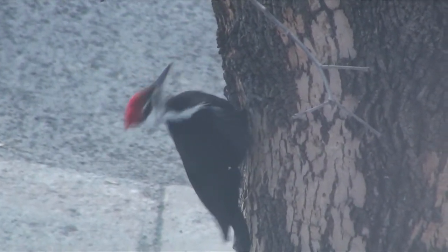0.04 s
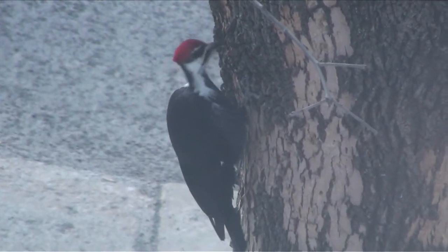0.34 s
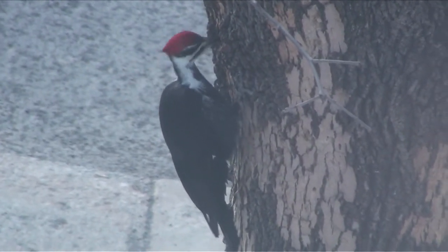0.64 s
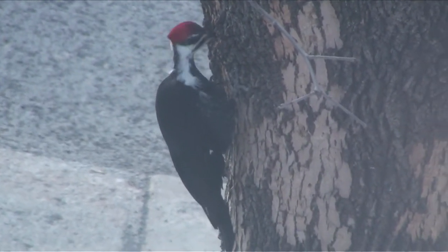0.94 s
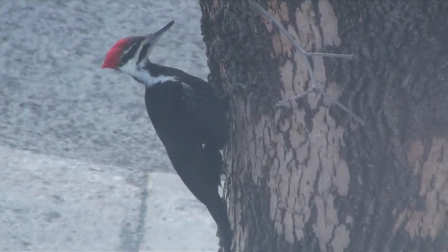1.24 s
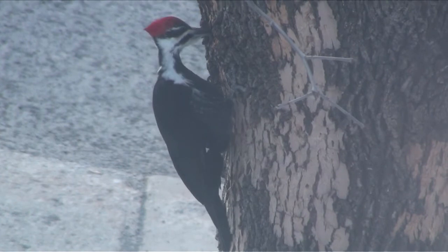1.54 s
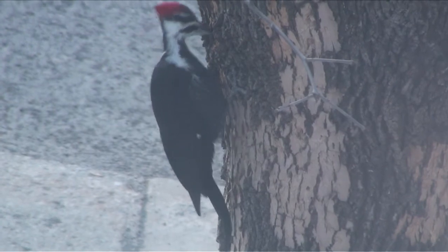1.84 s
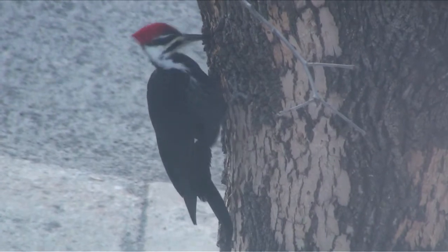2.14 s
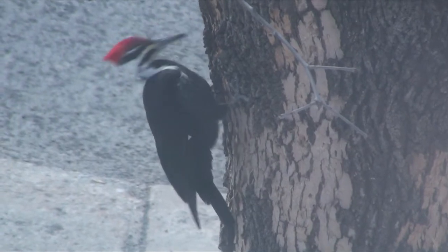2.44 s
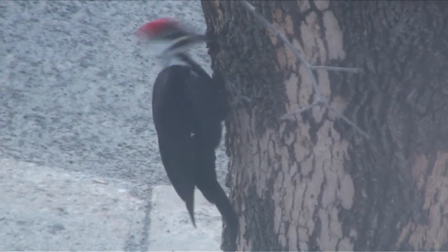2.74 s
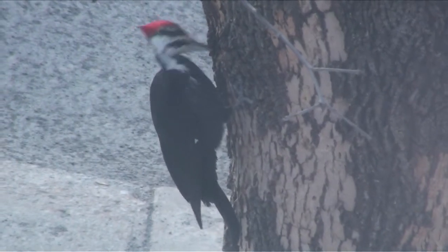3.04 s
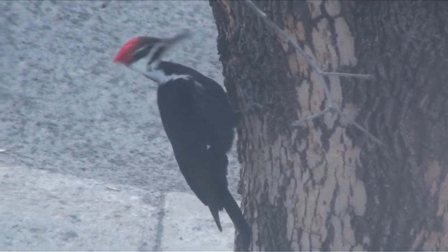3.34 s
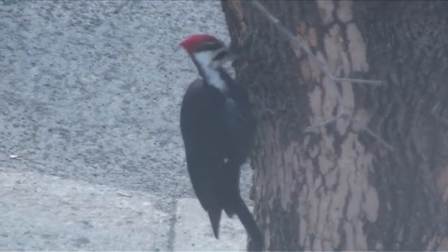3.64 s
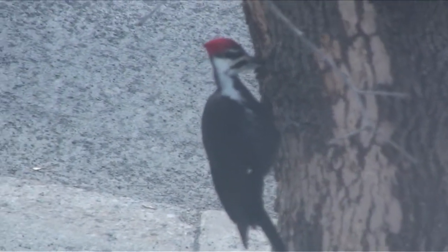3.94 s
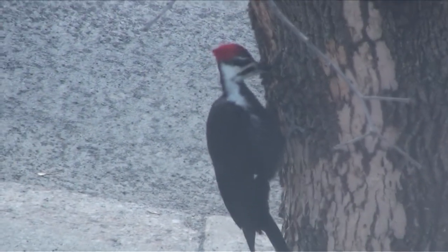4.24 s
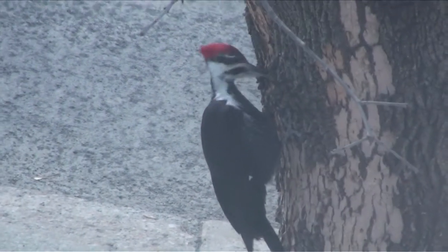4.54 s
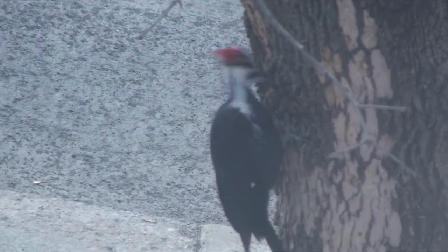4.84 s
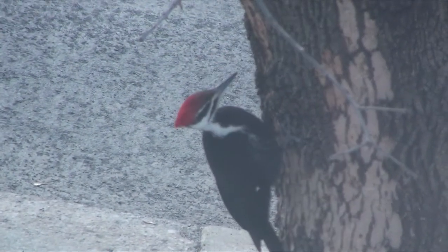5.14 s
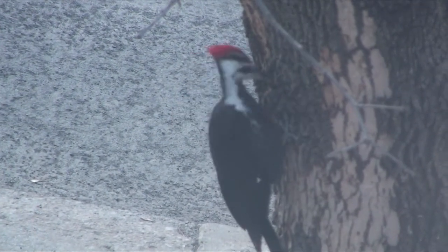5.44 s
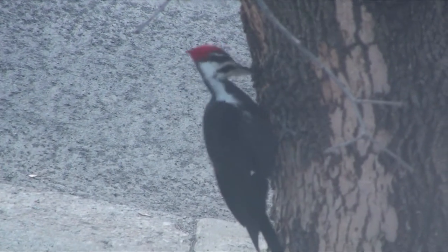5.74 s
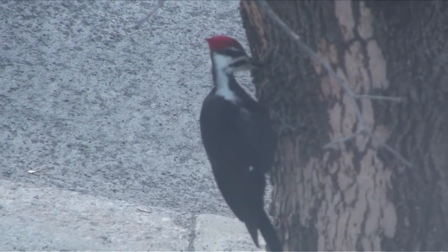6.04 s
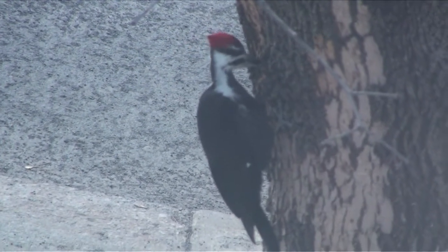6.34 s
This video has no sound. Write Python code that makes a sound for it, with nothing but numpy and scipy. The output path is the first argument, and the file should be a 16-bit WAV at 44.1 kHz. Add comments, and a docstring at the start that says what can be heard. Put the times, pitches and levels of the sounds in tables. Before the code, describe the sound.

A woodpecker picks at a tree trunk outdoors with light, irregular pecks and faint scratches. About a second and a half in, one hard blow cracks the bark and makes the wood ring briefly, with a short echo from nearby walls. Sparse, softer taps follow. The bird sits slightly right of the microphone, over steady distant traffic rumble, soft hiss, a few dull bumps and a very faint far bird at the start.

```python
"""Woodpecker on a tree trunk

A large woodpecker picks at the bark with light pecks and faint scratches that set flakes ringing.
One hard chisel blow cracks the bark and makes the trunk ring. Nearby walls echo the bill briefly.
Behind it lie a steady traffic rumble, soft hiss, a very faint far bird and a few dull bumps."""
import sys
import numpy as np
from scipy import signal
from scipy.fft import rfft, irfft, next_fast_len
from scipy.io import wavfile
from scipy.ndimage import map_coordinates

SR = 44100
rng = np.random.default_rng(int(sys.argv[2]) if len(sys.argv) > 2 else 0)


def int16_out(signal):
    """Quantize to a 16-bit WAV file."""
    q = np.round(np.clip(np.atleast_2d(signal).T, -1, 1) * 32767)
    wavfile.write(sys.argv[1], SR, q.astype(np.int16))


N = 281799

# Levels in the tables are relative; t60 is the time a sound takes to fade by 60 dB.
# tone colour of the traffic, the hiss both ears share, and the hiss that differs: f/Hz, level/dB
TRAFFIC_COLOUR = [(20, -15), (50, -10), (100, -5.5), (150, -1.5), (185, -0.5), (265, -4), (305, -9),
                  (430, -15), (800, -42)]
HISS_COLOUR = [(200, -18.5), (450, -4.5), (600, 1.5), (740, -3), (950, -6), (1200, -5.5), (1400, -4.5),
               (1560, -9), (2700, -13), (4500, -17.5), (9000, -22.5), (15500, -27.5)]
SIDE_COLOUR = [(20, -22), (50, -13), (72, -10), (95, -17), (280, -8), (600, -5.5), (1200, -6),
               (2500, -13.5), (5000, -20.5), (9500, -25), (15000, -43.5)]
# thin wavering background tones: f/Hz, level/dB
THIN_TONES = [(595, -77.5), (850, -80), (1190, -84.5), (1400, -82.5), (2527, -80)]
# light pecks: t/s, level/dB, flake pitch f/Hz, flake ring level/dB, t60/s
LIGHT_PECKS = [(.011, -54.5, 4300, 0, 0.036), (.266, -49, 2940, -2, .033), (1.3949, -34, 6000, 0, 0.0059),
               (1.687, -55, 2380, 6, 0.021), (1.9348, -35, 3260, -3.5, 0.047), (2.136, -58, 4400, 6, .025),
               (2.727, -53.5, 5530, -8, 0.029), (2.937, -46.5, 2860, 3, .04), (2.987, -53.5, 3980, 4, .019),
               (3.493, -58.5, 4130, 9.5, .025), (3.766, -53, 4830, 0, .02), (3.8688, -50, 5900, -7, .01),
               (5.0246, -51, 4740, 4.5, .011), (5.541, -57.5, 4580, 9.5, .022)]
# resonances of the loose bark: f/Hz, width/Hz, level/dB
BARK_RESONANCES = [(1760, 180, -3.5), (2530, 270, -11), (3320, 110, 5.5), (4550, 550, -3.5),
                   (5700, 800, -7), (7060, 380, -3), (9600, 3500, -22)]
# modes (ringing notes) of a bark flake: ratio to its pitch, level/dB, looseness
FLAKE_MODES = [(.56, -5.5, 0.45), (1, 0, 0.39), (1.2, -6.5, 0.71)]
# how long the walls' echo lasts: f/Hz, t60/s
ECHO_DECAY = [(200, 0.52), (1000, 0.16), (3000, 0.26), (5200, 0.2), (8000, 0.15), (14000, 0.27)]
# the bill's blow into the wood, then a faint early echo of it: t/s, level/dB
BLOW_HITS = [(1.5069, -22.5), (1.531, -47)]
# modes of the trunk: f/Hz, level/dB, t60/s
TRUNK_MODES = [(272, -16.5, 0.059), (384, -8.5, 0.063), (502, -12, 0.069), (616, -6.5, 0.061),
               (755, -5, 0.052), (849, -5, 0.085), (966, -12, 0.1), (1052, -6.5, .055), (1179, 1, 0.032),
               (1334, 0, 0.038), (1736, -5, 0.051), (1927, -10, 0.058), (2212, -10.5, 0.061),
               (2740, -10.5, 0.09), (2800, -8.5, 0.098), (3600, -12, 0.057), (3740, -4, 0.056),
               (3900, -7, 0.033), (4020, -8, 0.026), (4715, -3, 0.042), (5000, -11, 0.083),
               (5330, -15, .06), (5960, -12, 0.038), (6640, 0.5, 0.025), (7500, 3, 0.023),
               (8200, -6.5, .033), (9040, -8, 0.049), (9700, -9.5, 0.062)]
# how far the trunk's ring is out of step between the ears: f/Hz, phase shift at each ear/rad
EAR_PHASE = [(700, .1), (1300, 0.44), (2300, .38), (3800, .17), (5000, .13), (7500, .13), (9500, 0.49)]
# tone colour of the bark's first crack and of its splitting: f/Hz, level/dB
CRACK_COLOUR = [(500, -25), (1700, -9), (3000, -6), (3900, 3), (5000, -2), (7400, 6), (9000, -11),
                (15000, -22)]
SPLIT_COLOUR = [(90, -42), (200, -15), (330, -11), (750, -2.5), (1300, -1.5), (1550, -3), (2500, -6),
                (3900, -4), (6300, -12.5), (7500, -13), (9500, -11.5), (11300, -16), (13400, -27),
                (15500, -21)]
# which side the blow leans to: f/Hz, right minus left level/dB
BLOW_LEAN = [(400, -1), (1300, 1.6), (2400, -1), (4000, -0.5), (7000, -2), (9500, 2), (14000, -1.4)]
# dull bumps: t/s, level/dB, f/Hz
DULL_BUMPS = [(1.545, -37, 443), (1.685, -41.5, 422), (1.945, -42, 263), (2.275, -40.5, 207),
              (3.881, -43, 177), (3.89, -43.5, 294), (4.058, -44.5, 234)]


def amp(db):
    """Turn decibels into a gain."""
    return 10 ** (np.asarray(db) / 20)


def unit(x):
    """Scale x to an average (rms) level of 1."""
    return x / np.sqrt(np.mean(x ** 2) + 1e-20)


def along(points, hz):
    """Read between the rows of an (f/Hz, value) table on a log frequency axis."""
    f, v = np.transpose(points)
    return np.interp(np.log(hz + 1), np.log(f + 1), v)


def filtered(x, response):
    """Give each frequency in x the gain response(hz)."""
    n = x.shape[-1]
    m = next_fast_len(n + 8192)
    return irfft(rfft(x, m) * response(np.fft.rfftfreq(m, 1 / SR)), m)[..., :n]


def wobble(rate):
    """A smooth random curve through `rate` points a second."""
    points = rng.standard_normal(int(N * rate / SR) + 4)
    return map_coordinates(points, [np.arange(N) * rate / SR])


def stereo_noise(response, size, side_db):
    """Filtered noise whose left and right differ by a weaker side part."""
    mid, side = filtered(rng.standard_normal((2, size)), response)
    return unit(np.array([mid + amp(side_db) * side, mid - amp(side_db) * side]))


def add(track, s, sound):
    """Mix a sound into the track, starting at s seconds."""
    part = track[..., max(round(s * SR), 0):][..., :sound.shape[-1]]
    part += sound[..., :part.shape[-1]]


def struck(t, rise, t60):
    """The loudness of something hit: a quick swell, then a fade (times in seconds)."""
    return (1 - np.exp(-(t / rise) ** 2)) * np.exp(-np.log(1000) * t / t60)


def background():
    """Distant traffic rumbles in the middle, under a wide soft hiss and a few thin tones."""
    t = np.arange(N) / SR
    noise = lambda colour: unit(filtered(rng.standard_normal(N), lambda hz: amp(along(colour, hz))))
    rumble_db = -56 - 2 * np.maximum(1 - t / 2.6, 0)  # grows for 2.6 s, then holds
    rumble = amp(rumble_db + 0.56 * wobble(7)) * noise(TRAFFIC_COLOUR)
    hiss_db = -60
    swell_db = hiss_db + np.exp(-(t - 3.35) ** 2)  # 1 dB louder around 3.35 s
    hiss = noise(HISS_COLOUR)
    # the body of the shared hiss swells; its treble stays level
    body = filtered(hiss, lambda hz: 1 / (1 + (hz / 3500) ** 4))
    hiss = amp(swell_db + 0.41 * wobble(7.8)) * body + amp(hiss_db) * (hiss - body)
    side = amp(swell_db - 0.94) * noise(SIDE_COLOUR)
    tones = sum(np.sqrt(2) * amp(db) * np.sin(2 * np.pi * hz * t + 1.5 * wobble(14))
                for hz, db in THIN_TONES)
    mid = rumble + hiss + tones
    return np.array([mid + side, mid - side])


def bark_colour(hz):
    """Loose bark boosts the frequencies near each of its resonances."""
    return sum((-1) ** k * amp(db) * 1j * hz * width / (centre ** 2 - hz ** 2 + 1j * hz * width)
               for k, (centre, width, db) in enumerate(BARK_RESONANCES))


def drifting_sine(hz, t, phase, looseness):
    """Cracked wood holds no pure pitch: the wave wanders, most in the high notes."""
    drift = looseness * np.sqrt(hz / SR) * np.cumsum(rng.standard_normal(len(t)))
    return np.sin(2 * np.pi * hz * t + phase + drift)


def scratches(count):
    """Bill and claws scratch faintly at random moments: rows like those of LIGHT_PECKS."""
    middle_db, scatter_db, typical_hz, ring_db, t60 = -63, 2, 5190, 5, 0.031
    return [(when * N / SR, middle_db + scatter_db * (2 * size - 1),
             typical_hz * 2 ** (pitch - .5), ring_db, t60)
            for when, size, pitch in rng.random((count, 3))]


def pecks():
    """Each light peck snaps at contact, crunches the bark and sets one flake ringing."""
    out, t = np.zeros((2, N)), np.arange(SR // 8) / SR
    firm_db, soft_hz = -39.5, 12000
    for s, db, hz, ring_db, t60 in [*LIGHT_PECKS, *scratches(count=14)]:
        rise = 0.058 * t60 / (1 + amp(db - firm_db) ** 2)  # firm pecks bite, gentle ones swell
        snap_db = -10 + 5 * np.log2(0.018 / t60)  # the shorter the peck, the harder the snap
        snap = amp(snap_db) * rng.standard_normal(len(t)) * struck(t, rise=0.00042, t60=0.0046)
        crunch = stereo_noise(bark_colour, len(t), side_db=-12)
        flake = sum(amp(mode_db) * drifting_sine(ratio * hz, t, 0, looseness)
                    for ratio, mode_db, looseness in FLAKE_MODES)
        add(out, s, amp(db) * (snap + (crunch + amp(ring_db) * flake) * struck(t, rise, t60)))
    # corky bark swallows the highest treble
    return filtered(out, lambda hz: 1 / (1 + (hz / soft_hz) ** 5))


def wall_echo(x, delay_s, side_db):
    """Nearby walls send back a short, blurred echo whose bass lasts longest."""
    hz, t, spectrum = signal.stft(rng.standard_normal((2, SR // 2)), SR, nperseg=256)
    fade = np.exp(-np.log(1000) * t / along(ECHO_DECAY, hz)[:, None])
    mid, side = signal.istft(spectrum * fade, SR, nperseg=256)[1]
    tail = np.array([mid + amp(side_db) * side, mid - amp(side_db) * side])
    tail = np.pad(tail / np.linalg.norm(tail[0]), ((0, 0), (round(delay_s * SR), 0)))
    return signal.fftconvolve(x.mean(0)[None], tail, axes=1)[:, :N]


def far_bird():
    """Nine slightly slowing notes, each a pip and a fainter upward slide, blurred by distance."""
    out, t = np.zeros(N), np.arange(SR // 7) / SR
    start_s, gap_s, gap_growth_s = .077, .1668, .0016
    pip_hz, slide_hz, climb_hz_per_s = 1930, 2000, 26000
    slide_phase = 2 * np.pi * (slide_hz + climb_hz_per_s * t / 2) * t
    for k in range(9):
        s = start_s + gap_s * k + gap_growth_s * k * (k - 1) / 2
        blur = wobble(500)[:len(t)]
        pip = np.sin(2 * np.pi * pip_hz * t + .3 * blur) * np.exp(-((t - .013) / 0.0084) ** 2)
        slide = np.sin(slide_phase + np.pi * blur) * np.exp(-((t - .06) / 0.029) ** 2)
        add(out, s, amp(-61 + rng.normal(0, 1)) * (pip + amp(-7.5) * slide))
    return out


def chisel_blow():
    """The bill drives into the trunk: the wood rings while the bark cracks and splits."""
    out, t = np.zeros((2, N)), np.arange(SR // 4) / SR
    ear_sign = np.array([[-1], [1]])  # left, right
    for s, db in BLOW_HITS:
        wood = np.zeros((2, len(t)))
        for hz, mode_db, t60 in TRUNK_MODES:
            phase = rng.uniform(0, 2 * np.pi) - along(EAR_PHASE, hz) * rng.choice([-1, 1]) * ear_sign
            ring = drifting_sine(hz, t, phase, looseness=0.21)
            wood += amp(mode_db) * ring * struck(t, rise=0.003, t60=t60)
        crackle = amp(1.9 * wobble(900)[:len(t)])  # fibres give way unevenly
        split = stereo_noise(lambda hz: amp(along(SPLIT_COLOUR, hz)), len(t), side_db=-8)
        split *= crackle * struck(t, rise=0.0035, t60=0.046)
        crack = stereo_noise(lambda hz: amp(along(CRACK_COLOUR, hz)), len(t), side_db=-14)
        crack *= struck(t, rise=0.0019, t60=0.021)
        add(out, s, amp(db) * (amp(0.2) * wood + amp(5) * split + amp(4) * crack))
    # the wood sends its middle notes more to the right
    return filtered(out, lambda hz: amp(along(BLOW_LEAN, hz) * ear_sign / 2))


def bumps():
    """Soft contacts: each is a low, quickly fading note with one hollow overtone."""
    out, t = np.zeros(N), np.arange(SR // 4) / SR
    for s, db, hz in DULL_BUMPS:
        t60 = 0.094 * (220 / hz) ** 2  # higher bumps die sooner
        body = np.sin(2 * np.pi * hz * t) * struck(t, rise=0.0012, t60=t60)
        hollow = np.sin(2 * np.pi * 2.56 * hz * t) * struck(t, rise=.001, t60=0.69 * t60)
        add(out, s, amp(db) * (body + amp(-6.5) * hollow))
    return out


def scene():
    """The woodpecker on its trunk, a little to the right, in the open air."""
    blow, taps = chisel_blow(), pecks()
    echo = amp(-12.5) * wall_echo(blow + amp(-1) * taps, delay_s=.005, side_db=-11)
    woodpecker = (blow + taps) * amp([[-.8], [.8]])
    surroundings = (background() + bumps() + far_bird()) * amp([[-.45], [.45]])
    return woodpecker + echo + surroundings


def record(dry):
    """Cut away the very highest treble."""
    return filtered(dry, lambda hz: hz < 15850)


dry = scene()
out = record(dry)
int16_out(out)
```